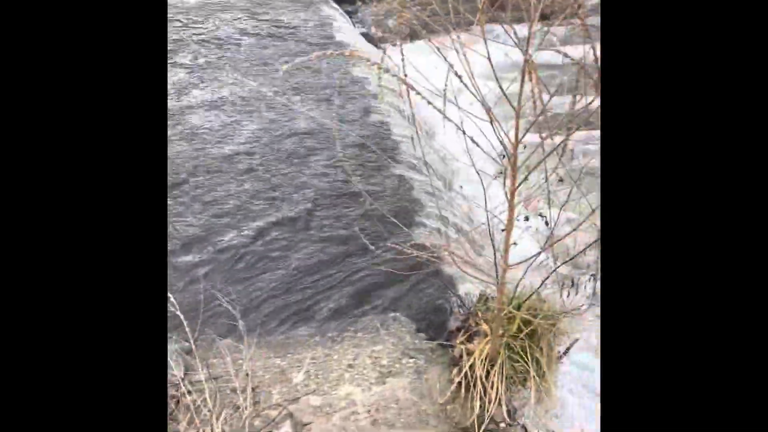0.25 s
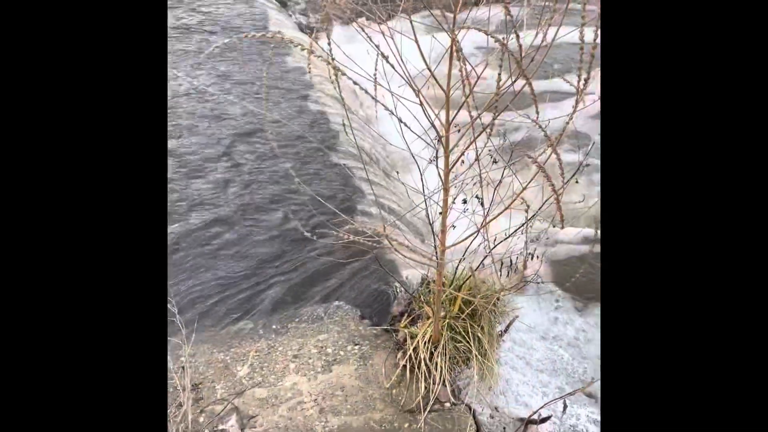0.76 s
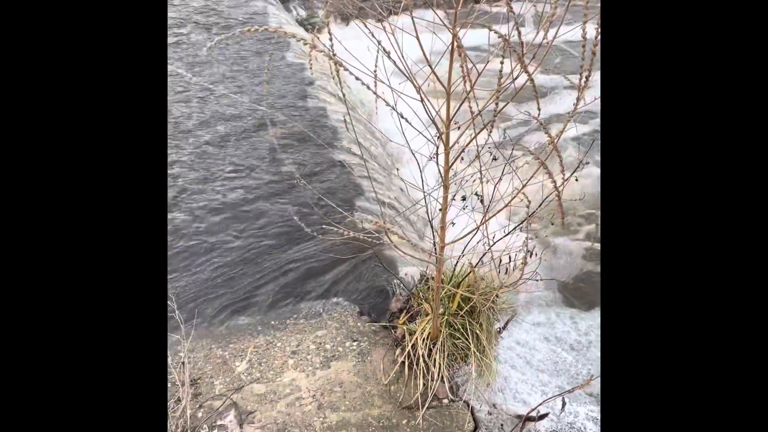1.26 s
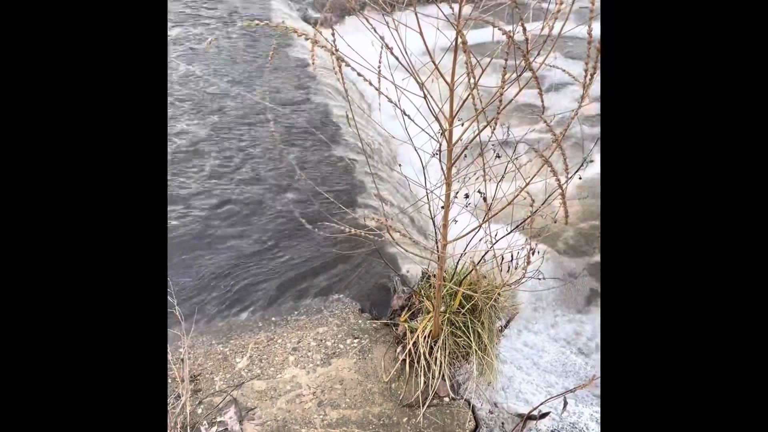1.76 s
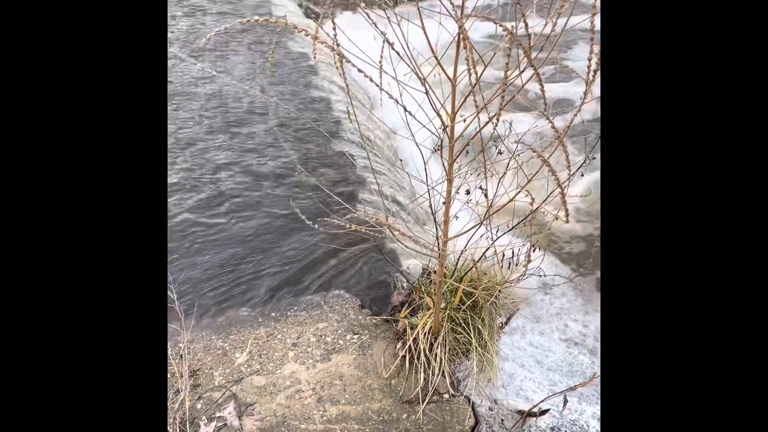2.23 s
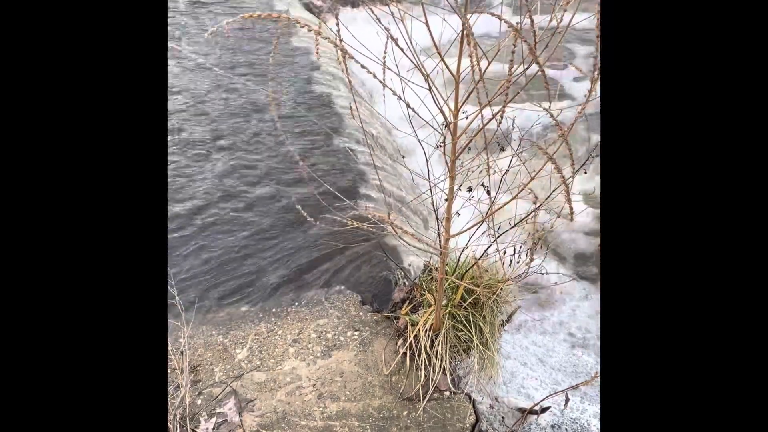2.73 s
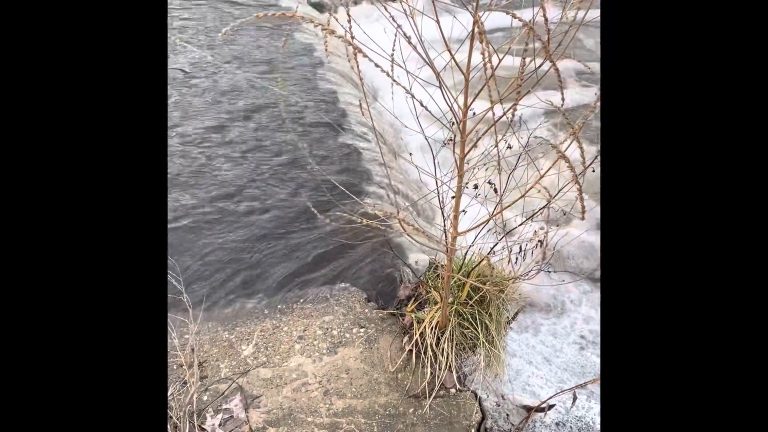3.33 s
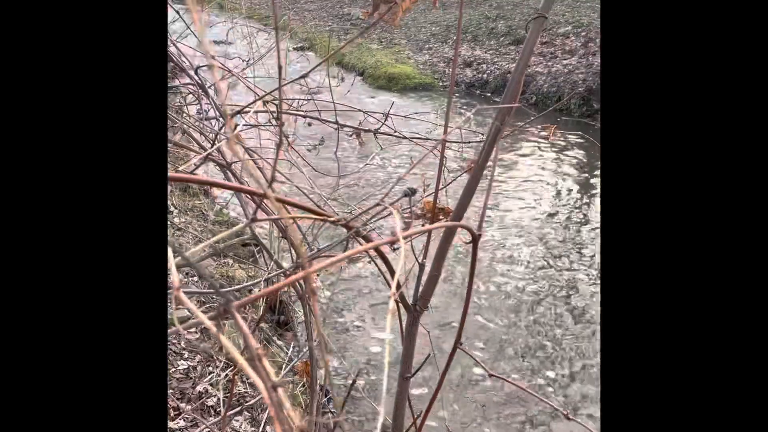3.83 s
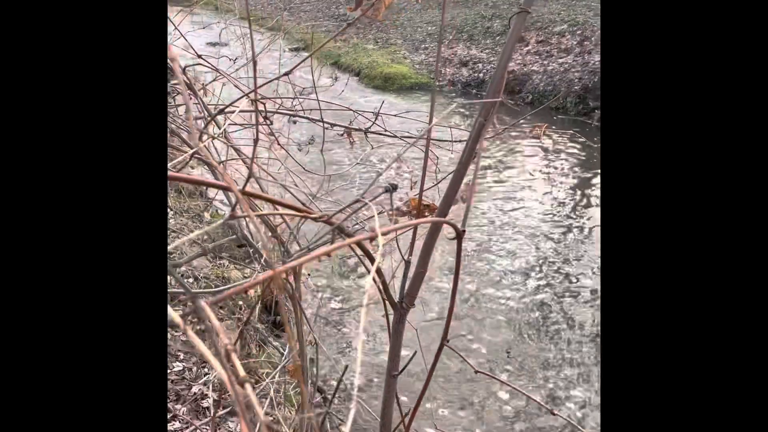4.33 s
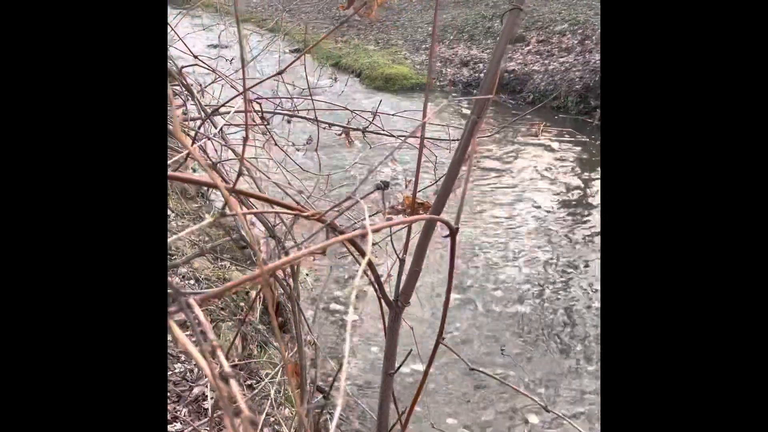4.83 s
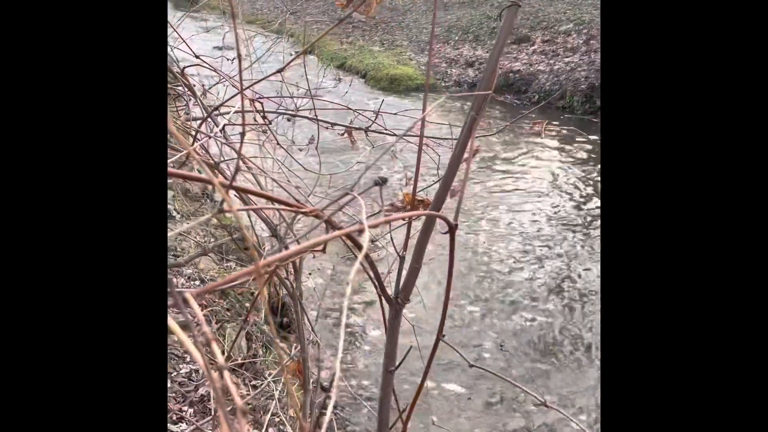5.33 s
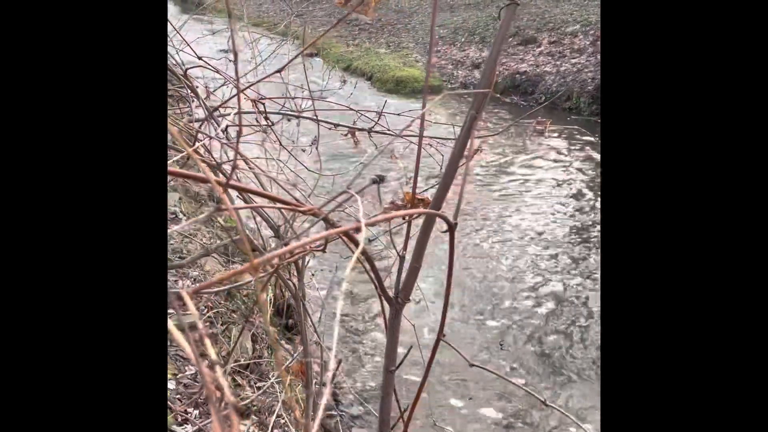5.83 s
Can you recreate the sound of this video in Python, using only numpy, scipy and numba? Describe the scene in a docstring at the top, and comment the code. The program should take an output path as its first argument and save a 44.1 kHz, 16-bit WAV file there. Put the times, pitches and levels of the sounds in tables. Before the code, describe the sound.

Outdoors, near a small weir, full rushing water fills both sides, bright with splashes and brief pitched plops, over low wind rumble and a droning undertone. The roar eases slightly, then cuts hard. A calm shallow reach fades in quickly, much softer: longer-ringing bubbles, folding ripples and fine drips over distant low rumble. Dry woody snaps tick just before the end. Phone microphone, close and raw.

```python
"""A creek pours over a concrete ledge close to a hand-held phone: resonant bubbles and bursts of spray make the roar.
Narrow bands of noise drone below it, and wind raises low rumbles on the microphone. After an abrupt cut, a quiet
reach downstream fades in: sparser, longer-ringing bubbles gurgle over a distant noise rumble and a wavering
sine hum, and a dry twig crackles in short rings with a rustle of tiny cracks."""
import sys
import numpy as np
from scipy import signal
from scipy.fft import rfft, irfft, next_fast_len
from scipy.io import wavfile
from scipy.ndimage import uniform_filter1d, map_coordinates
from numba import njit

SR = 44100
rng = np.random.default_rng(int(sys.argv[2]) if len(sys.argv) > 2 else 0)


def to_wav(sig):
    """Store sig (one row per channel, or 1-D mono) as 16-bit WAV at the path in sys.argv[1].

    Samples outside -1..1 are clipped; the rate is SR.
    """
    pcm = np.clip(np.atleast_2d(sig), -1, 1) * 32767
    pcm = np.round(pcm).astype(np.int16)
    wavfile.write(sys.argv[1], SR, pcm.T)  # frames by channels


N = 268039
TOP_HZ = 15800  # upper limit of the bubbles and of the recorded band
SIDES = np.array([[1], [-1]])  # left, right


def undb(db):
    """Level to amplitude: 20 dB is a factor of ten."""
    return 10 ** (np.asarray(db) / 20)


def unit(x):
    """Normalization to an rms amplitude of 1."""
    return x / np.sqrt(np.mean(x ** 2))


def times():
    """Sampling: the time of every sample in s."""
    return np.arange(N) / SR


def bins():
    """Discrete spectrum: the frequencies in Hz on which filters are drawn."""
    return np.linspace(0, SR / 2, next_fast_len(N, True) // 2 + 1) + 1e-3  # keeps log and division finite


def colour(points):
    """Spectral shaping: gain per frequency, interpolated in dB over log frequency from (f/Hz, level/dB)."""
    hz, db = np.transpose(points)
    return undb(np.interp(np.log(bins()), np.log(hz), db))


def filtered(x, gain):
    """Linear filtering: multiply the spectrum by a gain per frequency."""
    size = next_fast_len(N, True)
    return irfft(rfft(x, size) * gain, size)[..., :N]


def walk(rate):
    """Random modulation: levels held for 1 / rate s and smoothed twice, with rms 1."""
    k = int(SR / rate)
    held = np.repeat(rng.standard_normal(1024), k)[:N]
    return unit(uniform_filter1d(uniform_filter1d(held, k), k))


def swell(peak_s, half_s):
    """Gaussian envelope: 1 at its peak, 1/e at half_s to either side."""
    return np.exp(-((times() - peak_s) / half_s) ** 2)


def swells(table, steady=0):
    """Incoherent addition: the powers of (t/s, level/dB, half length/s) swells and of a steady gain add."""
    power = sum((undb(db) * swell(s, half_s)) ** 2 for s, db, half_s in table)
    return np.sqrt(steady ** 2 + power)


@njit
def rings(start_s, size, hz, t60, glide):
    """Damped oscillation: sines decay by 60 dB in t60 s while their pitch changes by the share glide."""
    out = np.zeros(N)
    for k in range(len(hz)):
        first, length = int(start_s[k] * SR), int(t60[k] * SR) + 2
        z = size[k] + 0j
        pole = np.exp(2j * np.pi * hz[k] / SR - np.log(1000) / length)
        bend = np.exp(2j * np.pi * hz[k] / SR * glide / length)
        for i in range(max(first, 0), min(first + length, N)):
            out[i] += z.imag
            z *= pole
            pole *= bend
    return out


def blips(table, cycles, glide):
    """Resonance with a gradual onset: a slow decay minus a fast one, for rows of (t/s, peak level/dB, f/Hz)."""
    s, db, hz = np.array(table, float).T.copy()
    size = undb(db) / .47  # the difference of the two decays peaks near .47
    slow = rings(s, size, hz, cycles / hz, glide)
    fast = rings(s, size, hz, cycles / hz / 4, glide / 4)
    return slow - fast


def bubbles(count, cycles, spread_db, glide):
    """Bubble resonance: a cloud of air bubbles of all sizes, with equal power at every frequency."""
    when, radius, strength, damping, side = rng.random((count, 5)).T
    lowest = np.sqrt(200)
    hz = (lowest + radius * (np.sqrt(TOP_HZ) - lowest)) ** 2
    size = undb(-spread_db * np.log(np.maximum(strength, .015))) * hz ** .75
    polarity = np.sign(side - .5)
    t60 = cycles * (.5 + damping) / hz
    return unit(rings(when * N / SR, size * polarity, hz, t60, glide))


def spray(count, spread_db, burst_s, surge_db):
    """Impact noise: drops hit the surface in loose showers, each a very short burst of hiss."""
    when, strength = rng.random((count, 2)).T
    size = undb(-spread_db * np.log(np.maximum(strength, .004)))
    impacts = np.bincount((when * N).astype(int), size ** 2, N)
    power = signal.lfilter([1], [1, -np.exp(-1 / (burst_s * SR))], impacts)
    return unit(np.sqrt(power) * rng.standard_normal(N) * undb(surge_db * walk(22.34)))


def water(near_bubbles, drops, wash_db, spray_hz):
    """Power crossover: near bubbles over the blurred wash of far ones; spray takes over in the treble."""
    body = unit(near_bubbles + undb(wash_db) * rng.standard_normal(N))
    share = 1 / (1 + (spray_hz / bins()) ** 2)
    return filtered(body, np.sqrt(1 - share)) + filtered(drops, np.sqrt(share))


def slops(table, cycles):
    """Clustered resonance: each slop drives a short, dense cluster of bubbles around one size."""
    cloud, out = bubbles(count=20000, cycles=cycles, spread_db=2.5, glide=0.18), 0
    for s, db, half_s, hz in table:
        sos = signal.butter(2, [hz / 1.5, hz * 1.5], "band", fs=SR, output="sos")
        out = out + unit(signal.sosfilt(sos, cloud)) * undb(db) * swell(s, half_s)
    return out


def rumble(gain, side_db):
    """Interaural coherence: low noise, mostly alike in both ears, with a weaker opposed part."""
    mid, side = filtered(rng.standard_normal((2, N)), gain)
    return unit(mid + undb(side_db) * side * SIDES)


def drifting(x, share, rate):
    """Frequency modulation by resampling: both channels wander by a share of pitch, rate times a second."""
    place = np.cumsum(1 + share * walk(rate))
    return np.array([map_coordinates(channel, [place], order=3, mode="mirror") for channel in x])


def stereo(image, common, opposed=0):
    """Interchannel phase, level and coherence: each set per frequency from a common and an opposed part."""
    hz, lead, balance_db, opposed_db = np.transpose(image)
    spread = colour(np.transpose([hz, np.minimum(opposed_db, 0)]))
    middle = filtered(common, 1 / np.hypot(1, spread))
    side = filtered(opposed + np.zeros(N), spread / np.hypot(1, spread))
    balance = colour(np.transpose([hz, balance_db])) ** (SIDES / 2)
    phase = np.exp(.5j * SIDES * np.interp(bins(), hz, lead))
    return filtered(middle + SIDES * side, balance * phase)


# stereo image at the reach: f/Hz, left lead/rad, left minus right/dB, opposed re common part/dB
REACH_IMAGE = [(260, -1.3, .7, -3), (520, -.25, -2.2, -9), (750, 0, .4, -15), (1050, 0, -2, -16),
               (1400, 0, 0, -22), (2100, 0, 0, -32), (2450, 0, -.3, -18), (2750, .5, -7, -8),
               (3150, 1.4, -3, -6.5), (3700, .8, 1.5, -5.5), (4200, .35, 0, -9), (4700, .6, 0, -6),
               (4900, 2, 0, -2), (5250, 6.15, 0, -13), (5600, 6.3, -.5, -19), (6500, 7.4, 0, -8),
               (8200, 8.2, 0, -7), (9200, 9.25, 0, -28), (10900, 9.55, 0, -28), (12000, 10.4, 0, -6),
               (13500, 11.7, 0, -7), (14700, 12.5, 0, -24)]


def reach_stereo(common, opposed=0):
    """Interchannel differences on the quiet reach."""
    return stereo(REACH_IMAGE, common, opposed)


# stereo image at the weir: f/Hz, left lead/rad, left minus right/dB, opposed re common part/dB
WEIR_IMAGE = [(300, -.1, .3, -24), (520, -.4, -2.8, -15), (700, 0, -2.2, -22), (1050, 0, -2.6, -22),
              (1300, 0, -.3, -31), (2100, 0, 0, -48), (2600, 0, -.1, -28), (3050, 0, -3.8, -12),
              (3350, .6, -5.6, -6.5), (3750, 1.3, -1, -7), (4100, .85, 0, -11), (4600, 1.2, -.3, -7.5),
              (4850, 2, 0, -4), (5250, 6.15, 0, -18), (5700, 6.35, 0, -17), (6500, 7.4, 0, -9.5),
              (8400, 8.6, 0, -8.5), (9300, 9.3, 0, -30), (10800, 9.5, 0, -30), (11700, 10.2, 0, -7),
              (13500, 11.7, 0, -7), (14700, 12.5, 0, -24)]


def weir_stereo(common, opposed=0):
    """Interchannel differences at the weir."""
    return stereo(WEIR_IMAGE, common, opposed)


# dull buffets of wind and handling: t/s, level/dB, half length/s
BUFFETS = [(.11, -20, 0.072), (.63, -24.5, 0.056), (.765, -29, 0.041), (5.817, -32, 0.015)]
# their relative spectrum: f/Hz, level/dB
BUFFET_SPECTRUM = [(60, -20), (130, 3), (300, -2), (450, -12), (1200, -44), (5000, -90)]


def bumps():
    """Low-frequency noise bursts: short, toneless, dull buffets."""
    return rumble(colour(BUFFET_SPECTRUM), side_db=-18) * swells(BUFFETS)


# soft thumps before the high-pass: t/s, level/dB, f/Hz, t60/s
MICROPHONE_THUMPS = [(.024, -0.5, 99, .17), (.073, -7, 84, .2), (.085, -14, 345, .09),
                     (.112, -11, 175, .08), (.14, -11, 80, .09), (.163, -5, 163, .04), (.759, -9, 80, .07),
                     (.761, -15, 240, .044), (2.36, -12, 60, .16)]


def thumps():
    """Damped resonance: wind and handling thump alike in both channels; the microphone drops the deepest bass."""
    s, db, hz, t60 = np.array(MICROPHONE_THUMPS, float).T.copy()
    high_pass = signal.butter(4, 38, "high", fs=SR, output="sos")
    return signal.sosfilt(high_pass, rings(s, undb(db), hz, t60, -0.045))


# swells of the low hum: t/s, level/dB, half length/s
HUM_ENVELOPE = [(3.71, -33, .05), (3.89, -30, .06), (4.08, -33, .05), (4.28, -32, .05),
                (4.48, -32.5, 0.084), (4.74, -33, .1), (5.17, -33, 0.086), (5.72, -30.5, 0.25),
                (6.03, -26, 0.073)]


def hum():
    """Frequency modulation: a 104 Hz sine wavers in pitch and comes and goes, strongest near the end."""
    hz = 104 * (1 + .025 * walk(9))
    tone = np.sqrt(2) * np.sin(2 * np.pi * np.cumsum(hz) / SR)
    return tone * swells(HUM_ENVELOPE) * undb(2.4 * walk(22))


# relative spectrum of the steady rumble: f/Hz, level/dB
REACH_RUMBLE_SPECTRUM = [(10, -45), (20, -24), (40, -12), (62, 1.5), (85, -3), (106, -4.5), (130, -7.5),
                         (165, -16), (205, -14.5), (400, -26.5), (1500, -86)]
# relative spectrum of its swells, in the deep bass: f/Hz, level/dB
SWELL_SPECTRUM = [(20, -25), (45, -7), (62, 3), (85, 0), (103, 1), (130, -13.5), (200, -25), (400, -49),
                  (1500, -90)]
# the swells: t/s, level/dB, half length/s
REACH_SWELLS = [(3.77, -31, 0.036), (3.875, -28, 0.048), (4.1, -29.5, 0.054), (5.13, -32.5, 0.067),
                (5.49, -29.5, 0.054), (5.65, -30, 0.062), (5.78, -25.5, .06), (6.02, -27.5, 0.11)]


def reach_rumble():
    """Intensity panning: steady and swelling low noise, with the hum, leans to the left for a while."""
    steady = rumble(colour(REACH_RUMBLE_SPECTRUM), side_db=-4) * undb(-32)
    swelling = rumble(colour(SWELL_SPECTRUM), side_db=-3.5) * swells(REACH_SWELLS)
    pan_db = 4.2 * swell(5.22, .45)  # left minus right
    return (steady + swelling + hum()) * undb(np.array([pan_db, -pan_db]) / 2)


def hiss():
    """Band-limited noise: a faint, flickering hiss around 4.4 kHz."""
    band = 1 / (1 + ((bins() - 4400) / 520) ** 2) / (1 + (3300 / bins()) ** 8)
    return unit(filtered(rng.standard_normal(N), band)) * undb(-55.5 + 1.5 * walk(40))


# droplets on the quiet reach: t/s, peak level/dB, f/Hz
REACH_DROPLETS = [(4.142, -35, 3000), (4.177, -33.5, 3000), (4.448, -35, 5000), (4.615, -39, 5600),
                  (4.727, -32.5, 5500), (4.889, -39, 5800), (5.199, -39, 5500), (5.526, -36, 6000),
                  (5.639, -35, 5500)]


def droplets():
    """Damped resonance: droplets ring briefly, rising in pitch."""
    return blips(REACH_DROPLETS, cycles=26, glide=.2)


# larger bubbles on the quiet reach: t/s, peak level/dB, f/Hz
REACH_GURGLES = [(3.828, -37, 2890), (3.948, -30.5, 715), (4.204, -31.5, 1005), (4.218, -33.5, 1220),
                 (4.372, -33.5, 468), (4.42, -33, 2250), (4.453, -34, 665), (4.547, -31.5, 838),
                 (4.552, -33.5, 1540), (4.621, -33, 2470), (4.657, -36, 1710), (4.711, -27.5, 735),
                 (4.815, -33, 1080), (4.895, -37, 2030), (4.93, -37, 540), (4.993, -33, 2550),
                 (5.09, -35, 1040), (5.265, -36, 1420), (5.343, -33.5, 780), (5.36, -33.5, 870),
                 (5.37, -34, 595), (5.59, -36, 496), (5.783, -32, 1640), (5.835, -34, 870),
                 (5.843, -36, 2240)]


def gurgles():
    """Bubble resonance: a large bubble swells as it pinches off, then rings out rising in pitch."""
    return blips(REACH_GURGLES, cycles=48, glide=.13)


# ripples that fold over together: t/s, level/dB, half length/s, f/Hz
REACH_LAPS = [(4.22, -39, 0.045, 1000), (4.44, -39, 0.057, 1100), (4.695, -48, .03, 1400),
              (4.94, -40, .04, 1000), (5.1, -39.5, 0.033, 900), (5.39, -43, .045, 750),
              (5.82, -40, .04, 1100)]


def laps():
    """Clustered resonance: ripples fold over together and ring a group of bubbles."""
    return slops(REACH_LAPS, cycles=28)


# relative spectrum of the ripples: f/Hz, level/dB
REACH_SPECTRUM = [(20, -40), (250, -3), (450, -2.1), (850, -0.8), (1450, -5.0), (2000, -8.5), (2700, -11.5),
                  (3400, -17.1), (4400, -20.5), (4900, -22), (5500, -19.5), (6500, -23.5), (8200, -26.5),
                  (9800, -34.5), (11500, -26.5), (14200, -28), (15400, -33)]


def reach():
    """Sparse bubble resonance: shallow ripples fold in fewer, longer-ringing bubbles over a low rumble."""
    def ripple_layer():
        return water(bubbles(count=24000, cycles=33, spread_db=2.5, glide=0.15),
                     spray(count=20000, spread_db=2.0, burst_s=0.0005, surge_db=-2.0),
                     wash_db=-1.5, spray_hz=4470)
    pair = reach_stereo(ripple_layer(), ripple_layer())
    surge = swell(4.43, 0.26)  # the current surges once and a faint hiss rises with it
    level_db = -36.5 + 0.5 * surge + 0.67 * walk(11)
    ripples = unit(filtered(pair, colour(REACH_SPECTRUM))) * undb(level_db)
    near = laps() + gurgles() + droplets()
    return ripples + reach_rumble() + reach_stereo(near) + surge * hiss()


# snaps of the dry twig: t/s, peak level/dB, f/Hz
TWIG_SNAPS = [(5.7582, -30, 4200), (5.7943, -30, 4400), (5.8076, -31.5, 4430), (5.8156, -34.5, 4250),
              (5.8231, -28.5, 4100), (5.8297, -36, 3800), (5.8624, -35.5, 3750)]


def twig():
    """Damped resonance: dry snaps ring for milliseconds; a rustle of tiny cracks trails the loudest."""
    cracks = bubbles(count=9000, cycles=22, spread_db=0, glide=.1)  # the same rings serve as cracks
    band = 1 / (1 + ((bins() - 4100) / 1700 * 2) ** 4)
    rustle = unit(filtered(cracks, band)) * undb(-51.5) * swell(5.842, .022)
    return blips(TWIG_SNAPS, cycles=27, glide=.3) + rustle


# relative spectrum of the wind rumble: f/Hz, level/dB
WIND_SPECTRUM = [(20, -34), (32, -25), (50, 1.5), (85, 3), (125, -3), (200, -9.5), (450, -28), (1500, -79)]
# gusts on the microphone: t/s, level/dB, half length/s
WIND_GUSTS = [(.07, -19.5, 0.17), (.34, -26.5, .07), (.6, -24, 0.085), (.77, -20.5, 0.045),
              (2.25, -25, 0.79), (3.2, -23.5, 0.16), (3.5, -24, 0.11)]


def wind():
    """Low-frequency flow noise: gusts raise a rumble on the microphone above a calm level of -38 dB."""
    return rumble(colour(WIND_SPECTRUM), side_db=-21.5) * swells(WIND_GUSTS, undb(-38))


# narrow noise bands of the drone, deepest first: f/Hz, full width at half amplitude/Hz, relative level/dB
DRONE_RESONANCES = [(83, 11, -1.5), (119.3, 7, 1.5), (153, 8, 2.5), (226, 17, -0.5), (269, 14, -11.5),
                    (300, 33, -6.5), (346, 14, -2)]


def drone():
    """Narrow-band noise: a hollow, wavering drone whose upper bands set in and hold while the deep ones swell."""
    def bands(rows):
        gain = sum(undb(db) / (1 + ((bins() - hz) / width * 2) ** 2) for hz, width, db in rows)
        return drifting(rumble(gain, side_db=-25), share=.02, rate=5)
    onset = .5 + .5 * np.tanh((times() - 0.62) / 0.076)
    deep = bands(DRONE_RESONANCES[:3]) * undb(-25.5) * swell(2.63, 1.52)
    upper = bands(DRONE_RESONANCES[3:]) * undb(-29.5) * onset
    return deep + upper


# drops flung from the weir: t/s, peak level/dB, f/Hz, t60/s, bandwidth as a share of f (at most 1)
FLUNG_DROPS = [(.08, -15, 6500, .011, 0.51), (.428, -13, 3500, 0.027, 0.46), (.468, -14, 900, .03, .6),
               (.705, -13, 6260, .009, .25), (.781, -16, 5760, .009, .25), (.834, -14, 9000, .011, .6),
               (.879, -9.5, 6550, 0.011, 0.33), (.891, -6.5, 9000, .007, 0.56),
               (1.042, -12, 9000, .011, .6), (1.163, -10, 13000, .011, 0.46),
               (1.576, -10, 6800, .012, 0.43), (1.707, -13, 6500, .011, .6), (1.944, -19, 6500, .01, .25),
               (2.153, -13.5, 6700, .011, .4), (2.199, -18, 12500, .009, .4), (2.34, -18, 5500, .01, .3),
               (2.429, -9.5, 6000, 0.015, .4), (2.44, -13.5, 4300, .016, .9),
               (2.508, -6.5, 6160, 0.02, 0.63), (2.51, -18, 3900, .012, .5),
               (2.568, -11.5, 5500, .014, 0.44), (2.805, -20, 14000, .009, .3),
               (2.818, -15, 13500, .009, .3), (3.211, -12.5, 6400, .011, 0.22),
               (3.297, -13, 6100, .02, .45), (3.299, -10, 1300, .016, 0.46)]


def splashes():
    """Resonance excited by noise: each drop's short burst rings one broad resonance."""
    out, t = np.zeros(N), np.arange(2048) / SR
    for s, db, hz, t60, width in FLUNG_DROPS:
        burst = rng.standard_normal(len(t)) * np.exp(-np.log(1000) * t / t60)
        tick = signal.lfilter(*signal.iirpeak(hz, 1 / min(width, 1), fs=SR), burst)
        first = int(s * SR)
        out[first:first + len(t)] += undb(db) * tick / np.abs(tick).max()
    return weir_stereo(out)


# short pitched rings that stand out of the roar: t/s, peak level/dB, f/Hz
PITCHED_RINGS = [(.193, -15, 3000), (.237, -12, 1540), (.455, -14, 1660), (.467, -10, 3000),
                 (.643, -14, 885), (.751, -11.5, 2900), (.994, -12.5, 1145), (1.125, -15, 950),
                 (1.256, -16.5, 3000), (1.303, -15.5, 2150), (1.451, -18, 3620), (1.724, -16.5, 3120),
                 (2.539, -13.5, 3240)]


def pitched_rings():
    """Damped resonance: short pitched rings stand out of the roar, rising slightly in pitch."""
    return weir_stereo(blips(PITCHED_RINGS, cycles=17, glide=.12))


# slops of water that land as one short rush: t/s, level/dB, half length/s, f/Hz
WEIR_SLOPS = [(.195, -27, 0.012, 2700), (0.24, -24, 0.012, 1700), (0.365, -22, 0.011, 1690),
              (.455, -25, .02, 1200), (.68, -22.5, 0.014, 846), (.86, -28, 0.015, 1500),
              (1.26, -24, .012, 1700), (1.3, -24, 0.017, 1800), (1.412, -20, .015, 1300),
              (1.65, -22.5, .015, 1310), (1.855, -23.5, .013, 1310), (2.44, -28, 0.0082, 1890),
              (3.155, -21, 0.024, 1090)]


def weir_slops():
    """Clustered resonance: water lands in one short rush of bubbles."""
    return weir_stereo(slops(WEIR_SLOPS, cycles=12))


# relative spectrum of the roar: f/Hz, level/dB
WEIR_SPECTRUM = [(20, -26), (70, -12), (200, -2.5), (380, -5), (470, -11), (750, -5.5), (1000, -8),
                 (1300, -7), (1600, -10.5), (2100, -12), (2400, -11.5), (3000, -14.5), (3900, -18),
                 (4900, -19.5), (6300, -20), (9000, -23), (11500, -31.5), (14000, -24), (15400, -32.5)]


def weir():
    """Dense bubble resonance: the falling sheet churns up bubbles; drop impacts and tiny bubbles make its spray."""
    def churn_layer():
        impacts = spray(count=18000, spread_db=3.5, burst_s=0.0016, surge_db=1.5)
        tiny = bubbles(count=12000, cycles=11.6, spread_db=1.0, glide=0.051)
        churn = bubbles(count=48000, cycles=15.5, spread_db=3.0, glide=0.16)
        return water(churn, unit(impacts + undb(-7) * tiny), wash_db=-1.5, spray_hz=3650)
    pair = weir_stereo(churn_layer(), churn_layer())
    flow_db = -19.5 - 3.5 * np.maximum(times() - 2.96, 0)  # eases by 3.5 dB/s shortly before the cut
    roar = unit(filtered(pair, colour(WEIR_SPECTRUM))) * undb(flow_db + 0.59 * walk(20))
    return roar + splashes() + pitched_rings() + weir_slops()


def scene():
    """Superposition: the weir, then an abrupt cut, out of which the quiet reach fades in."""
    cut_s, cut_fade_s = 3.571, 0.011
    fade_in_s, fade_from_db = 0.13, -32
    since_cut = times() - cut_s
    before = np.clip(.5 - since_cut / cut_fade_s, 0, 1)
    fade_in = np.minimum(undb(fade_from_db) + np.maximum(since_cut, 0) / fade_in_s, 1)
    creek = before * (weir() + wind() + drone()) + (1 - before) * reach() * fade_in
    return creek + thumps() + bumps() + twig()


def record(dry):
    """Clipping and band limitation: the phone limits at full scale and cuts the top."""
    low_pass = signal.ellip(10, .2, 80, TOP_HZ, fs=SR, output="sos")
    return signal.sosfilt(low_pass, np.clip(dry, -1, 1))


dry = scene()
out = record(dry)
to_wav(out)
```